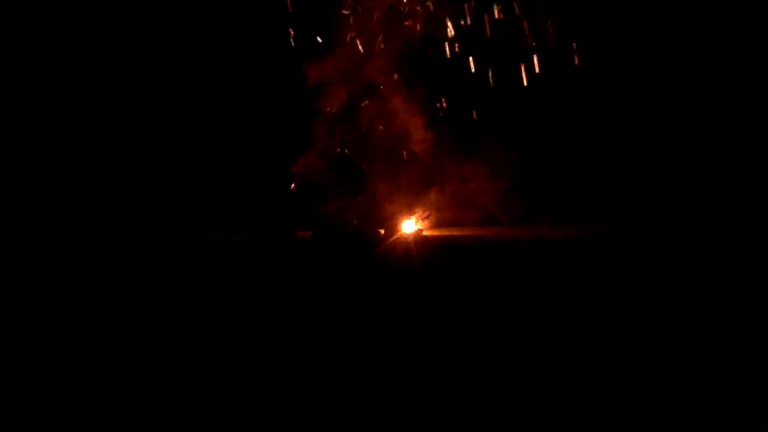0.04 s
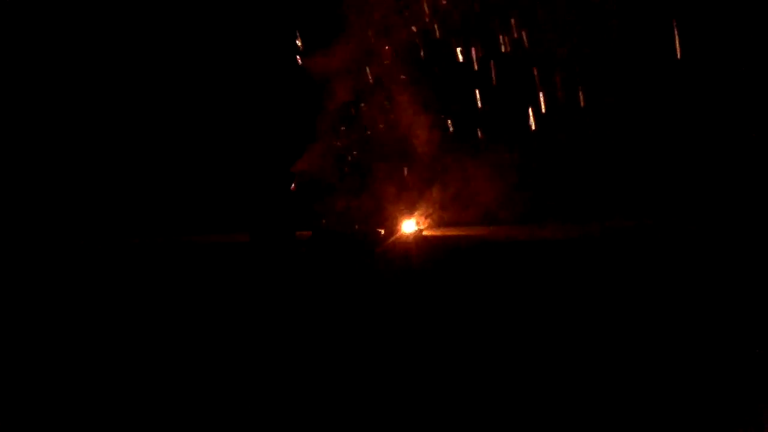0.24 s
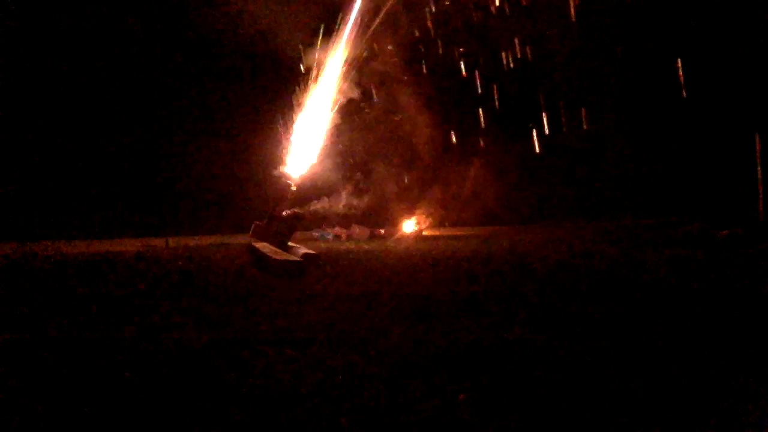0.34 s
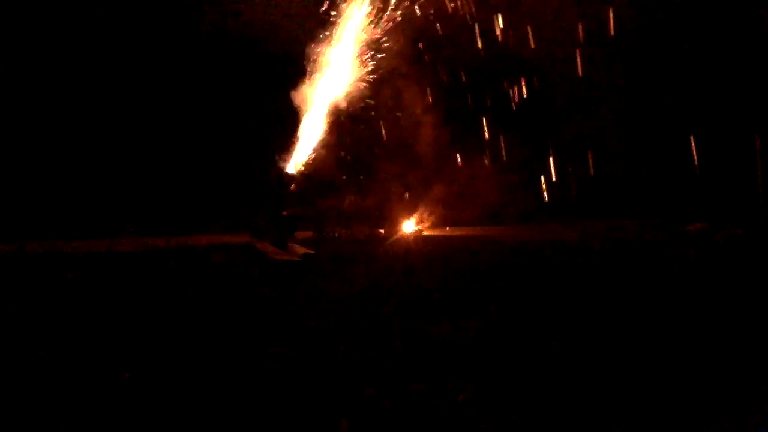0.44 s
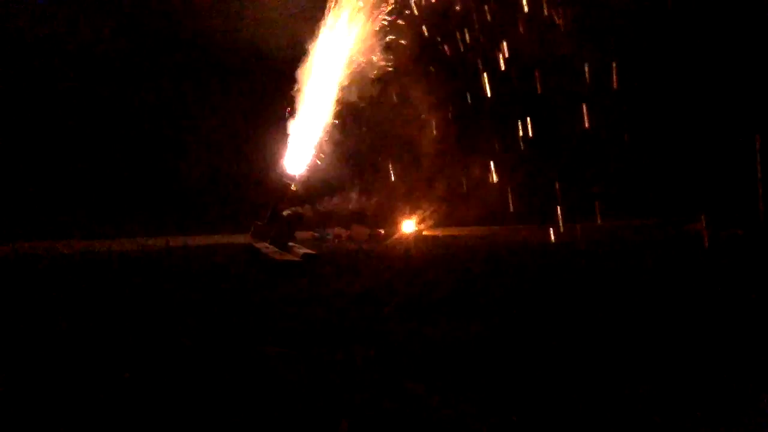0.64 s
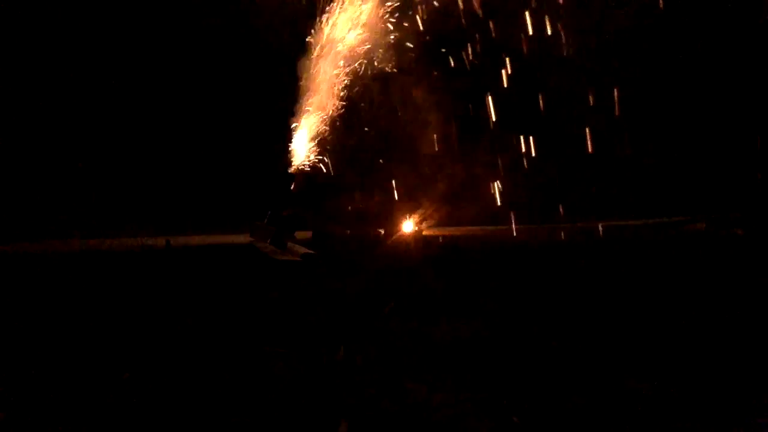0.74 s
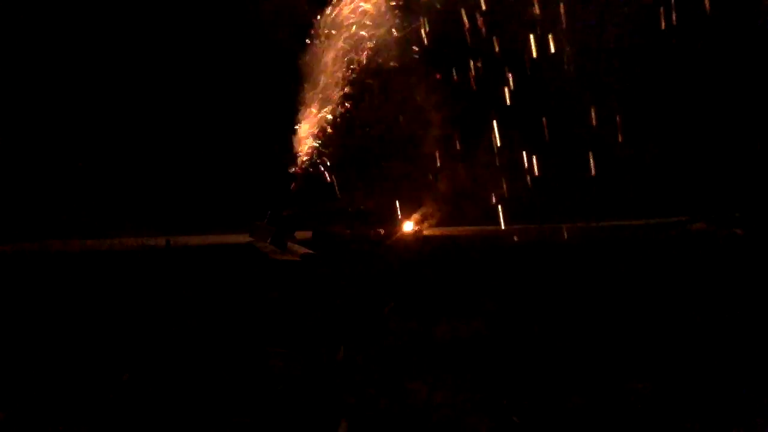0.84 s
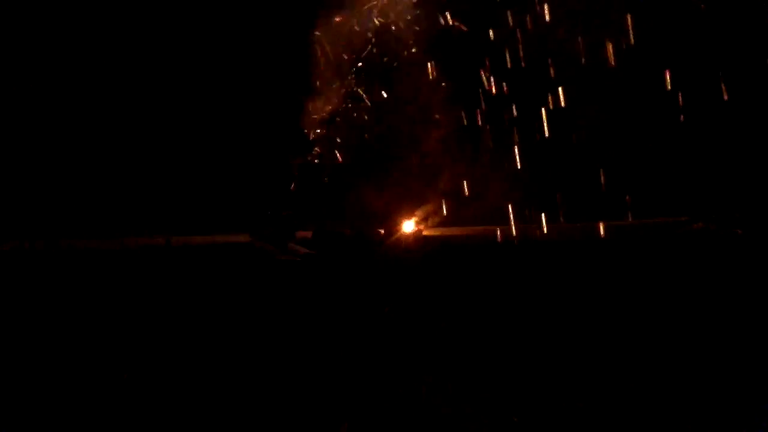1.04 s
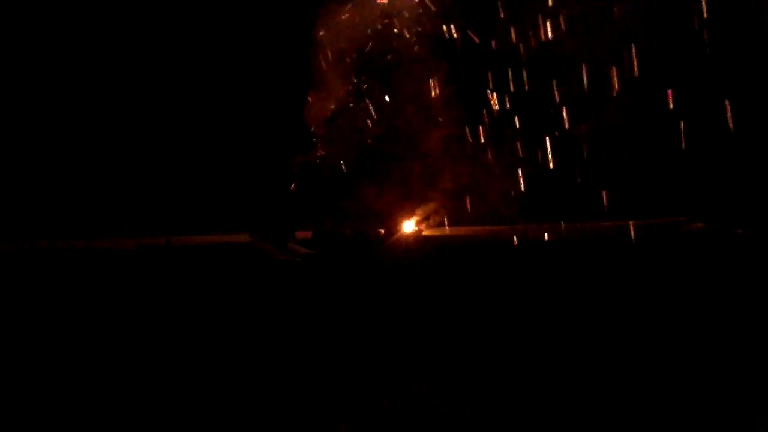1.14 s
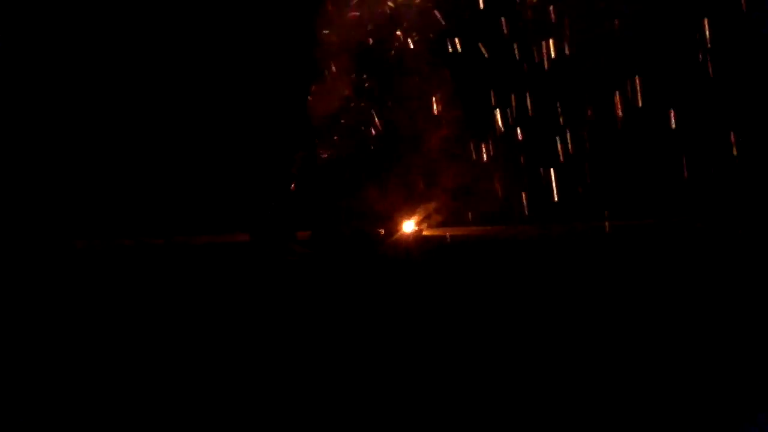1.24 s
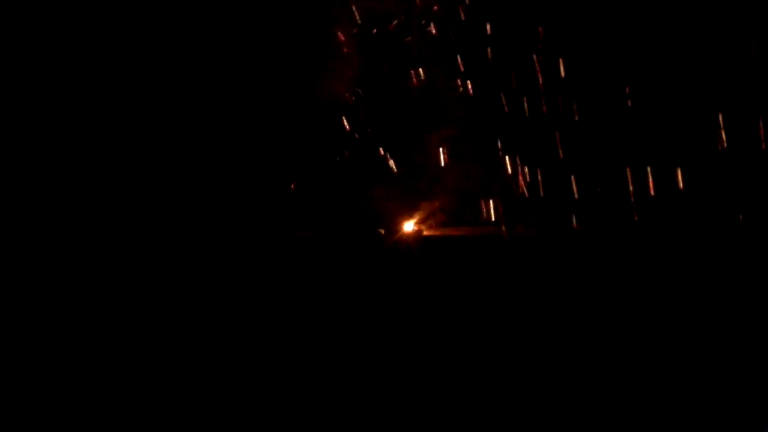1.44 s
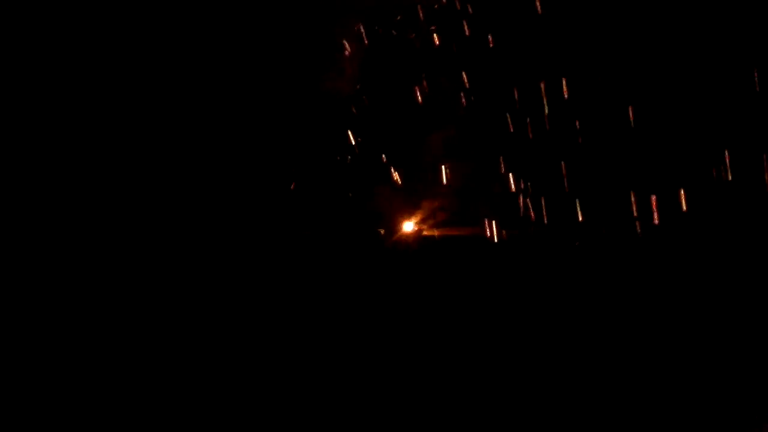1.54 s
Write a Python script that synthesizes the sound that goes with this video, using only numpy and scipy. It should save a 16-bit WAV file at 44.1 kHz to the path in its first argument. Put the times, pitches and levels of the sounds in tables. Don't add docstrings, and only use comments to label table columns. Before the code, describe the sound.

Firework crackle outdoors at night, close and clipping. A few dry snaps begin near 0.03 s, thickening from 0.2 s. A heavy launch thump hits at 0.29 s, another at 0.51 s, a smaller one at 0.59 s. Dense, harsh crackling peaks from 0.7 to 0.92 s; gas spits near 0.97 s. Lighter, brighter snaps run from 1.04 to 1.41 s, thinning over hiss and dull echo into near silence by 1.5 s.

```python
import sys
import numpy as np
from scipy import signal
from scipy.fft import rfft, irfft
from scipy.io import wavfile

SR = 44100
rng = np.random.default_rng(int(sys.argv[2]) if len(sys.argv) > 2 else 0)


def generate_wav(signal):
    frames = np.transpose(np.atleast_2d(signal))
    scaled = np.clip(frames, -1, 1) * 32767
    pcm = np.round(scaled).astype(np.int16)
    wavfile.write(sys.argv[1], SR, pcm)


def voltage_ratio(decibels):
    exponent = np.asarray(decibels, float) / 20
    return 10 ** exponent


N = 70560

# f/Hz, level/dB, t60/s
CRACK_MODES = [(8870, 0.5, 0.00091), (7430, -5.5, 0.0021), (10800, -11, 0.0015)]
# f/Hz, level/dB
GAS_COLOUR = [(120, -42), (200, -4.5), (1400, -3.5), (2090, -3), (3560, -8.5), (3900, -8.5), (8120, -2),
              (16000, -19)]


def ring(clicks, hz, t60):
    radius = voltage_ratio(-60 / (t60 * SR))
    angle = 2 * np.pi * hz / SR
    feedback = [1, -2 * radius * np.cos(angle), radius * radius]
    return signal.lfilter([0, np.sin(angle)], feedback, clicks + 1e-18)


def train(s, gains):
    return np.bincount((np.asarray(s) * SR).astype(int), gains, N + SR)[:N]


def rings(s, gains, hz, t60, size):
    pitch_scatter = 0.1
    out = 0
    for k in range(5):
        pitch = hz * np.exp(pitch_scatter * (k - 2) / 2)
        out = out + ring(train(s, gains * (size == k)), pitch, t60)
    return out


def coloured(spectrum):
    hz, db = np.transpose(spectrum)
    f = np.fft.rfftfreq(N, 1 / SR) + 1
    gain = voltage_ratio(np.interp(np.log(f), np.log(hz), db))
    noise = irfft(rfft(rng.standard_normal(N)) * gain, N)
    return noise / noise.std()


def dying(clicks, t60):
    return signal.lfilter([1], [1, -voltage_ratio(-60 / (t60 * SR))], np.abs(clicks) + 1e-18)


def band_noise(low_hz, high_hz):
    band = signal.butter(2, [low_hz, high_hz], "band", fs=SR, output="sos")
    noise = signal.sosfilt(band, rng.standard_normal(N))
    return noise / noise.std()


def night():
    # f/Hz, level/dB
    air_colour = [(59, -23), (100, 6), (1610, 21), (2750, 14.5), (7450, -31), (16000, -30)]
    return voltage_ratio(-80) * coloured(air_colour)


def fizz():
    # t/s, level/dB
    vigour_curve = [(0, -40), (.02, -17), (.032, -5), (.2, -2), (.35, 16), (.7, 8.5), (.97, 23), (1.1, 14),
                    (1.3, 13), (1.44, 6), (1.48, -18), (1.6, -25)]
    ticks_per_s, tick_db, spread_db, hiss_db = 500, -48, 3.0, -48
    vigour = voltage_ratio(np.interp(np.arange(N) / SR, *np.transpose(vigour_curve)))
    tick_size = voltage_ratio(tick_db + spread_db * np.minimum(rng.exponential(1, N), 4))
    ticks = tick_size * (rng.random(N) < ticks_per_s / SR)
    sparks = sum(voltage_ratio(g) * ring(ticks, hz, t60) for hz, g, t60 in CRACK_MODES[::2])
    return vigour * (sparks + voltage_ratio(hiss_db) * coloured(GAS_COLOUR))


def stars(big_gain, overload_gain):
    # t/s, crack level/dB, body level re crack/dB
    star_bursts = [(0.0263, -7.5, -16), (0.1332, 1.0, -18.8), (0.2131, -0.4, -23.6), (0.2195, 1.2, -20.8),
                   (0.2341, -12.8, -16.5), (0.2402, -20.3, -21.4), (0.25, -0.6, -26.3),
                   (0.2533, 1.8, -16.8), (0.2579, 0.3, -23.4), (0.2722, 1.5, -16.4), (0.2763, 0.0, -23.4),
                   (0.2778, 1.7, -16.9), (0.2797, 1.0, -19.8), (0.2819, -7, -20), (0.2835, -0.3, -18.9),
                   (0.2854, 0.6, -17.5), (0.2865, 0.5, -13.4), (0.2874, 0.7, -10.1), (0.2956, 1.1, -12.9),
                   (0.2988, -4, -14), (0.3068, -16, -7.0), (0.3248, -1.7, -24.1), (0.344, -5.1, -17.5),
                   (0.3471, -2.9, -24.0), (0.35, -0.0, -20.5), (0.3561, 0.6, -20.7), (0.3778, 0.2, -19.4),
                   (0.3809, -1.0, -20.9), (0.39, -13.8, -22.4), (0.4037, 1.0, -17.5),
                   (0.4083, -0.4, -23.3),
                   (0.4628, -8.2, -23.2), (0.471, 0.8, -21.7), (0.4809, 1.7, -16.4),
                     (0.4828, -15.6, -20.5), (0.4922, -15.9, -11.1), (0.5874, 2.0, -24),
                     (0.6339, 2.7, -10.6), (0.6482, -1.1, -7.9), (0.6546, 2.3, -8.2), (0.6611, 2.7, -9.6),
                     (0.705, 1.9, -9.6), (0.7129, 2.1, -8.5), (0.7153, 2.3, -9.4), (0.718, 2.4, -6.6),
                     (0.7187, 0.0, -7.0), (0.7222, -8.3, -9.8), (0.7344, 2.5, -7.7), (0.7365, 1.0, -6.4),
                     (0.7388, 2.1, -8.4), (0.7433, 2.0, -9.7), (0.7471, 2.2, -8.6), (0.7527, 2.1, -7.1),
                     (0.7585, 2.1, -9.1), (0.7596, 1.8, -6.4), (0.7638, 1.9, -7.9), (0.7677, 2.4, -11.3),
                     (0.7705, 2.7, -8.6),
                   (0.7778, 2.8, -13.7), (0.7792, 2.3, -13.7), (0.7803, 2.2, -9.8), (0.7813, 1.6, -6.2),
                  (0.7822, 1.0, -8.2), (0.7838, 1.6, -6.9), (0.7901, 1.8, -10.0), (0.7974, 2.7, -8.3),
                  (0.8077, 2.0, -9.0), (0.8083, 0.0, -7.0), (0.8103, 2.6, -7.1), (0.8144, 1.4, -6.6),
                  (0.8326, 1.4, -6.2), (0.8336, 2.7, -7.4), (0.8429, 1.3, -5.7), (0.8545, 2.3, -9.0),
                  (0.8598, 1.1, -6.7), (0.8607, 1.2, -4.8), (0.8723, 1.3, -6.0), (0.8737, 2.4, -8.6),
                  (0.8903, 2.3, -8.5), (0.8975, 1.5, -7.0), (0.9103, -0.5, -3.5), (0.9184, 1.7, -6.8),
                   (1.0355, -4.5, -19), (1.0584, 0.4, -26.2), (1.0637, -10.1, -17.6), (1.0809, -0.5, -18.6),
                   (1.0843, -4, -25.3), (1.0955, -22, -8), (1.1133, -15.4, -11.2), (1.1174, -3.4, -17.8),
                   (1.1255, 0.4, -17.1), (1.1268, -2.5, -17.0), (1.1342, -5.1, -15.3), (1.1383, -7.0, -9.7),
                   (1.1416, -3.7, -22.6), (1.1463, -4.3, -4.7), (1.1588, -1.1, -10.8),
                   (1.1605, -13.5, -11.6), (1.1645, -2.4, -21.2), (1.1675, -0.7, -15.8),
                   (1.1714, 0.4, -25.2), (1.1733, 0.5, -18.5), (1.1744, -1.0, -18.8), (1.1755, -0.9, -17.2),
                   (1.1804, 0.8, -16.7), (1.1849, -1.7, -18.9), (1.1925, -9.5, -25.3),
                   (1.1942, -13.4, -13.6),
                   (1.2019, 0.8, -23.9), (1.2054, -10.9, -17.7), (1.208, -9.3, -28.1),
                   (1.2099, -14.4, -20.0), (1.2139, -6.4, -14.7), (1.2167, -15.9, -17.6),
                   (1.2241, -0.6, -20.5), (1.2252, -5.9, -19.7), (1.2271, -7.7, -20.7),
                   (1.2325, -1.4, -23.8), (1.2341, -15.4, -18.8), (1.2396, -17.1, -16.2),
                   (1.2466, -11.8, -25.1), (1.2512, -5.7, -15.9), (1.2547, -8.2, -20.1),
                   (1.2612, 1.3, -15.0), (1.2632, -13.2, -13.7), (1.2727, -1.4, -17.8),
                   (1.2876, -1.9, -21.3), (1.2997, 0.3, -18.0), (1.3152, -14.7, -17.9),
                   (1.3224, 1.9, -14.3), (1.3285, -18, -20), (1.3338, -2.1, -17.2), (1.3431, 1.8, -15.2),
                   (1.3768, -26, -18.7), (1.4146, -2, -18)]
    # f/Hz, level/dB, t60/s
    body_modes = [(2960, -1.5, 0.0035), (5720, -5, 0.00083), (1157, 2.5, 0.0027), (600, -17, 0.0049),
                  (288, -10.5, .013)]
    # t/s, first body mode level/dB
    ground_image = [(0, -21), (.2, -5), (.6, -2), (1.0, 0), (1.25, -5), (1.33, 7), (1.6, -10)]
    lead_s, suction_s = .00007, .00008
    mode_scatter_db, big_from_db = 1.5, -17.5
    small_thud_share = 0.54
    bounce_s, bounce_db = .0006, -14
    grit_db, grit_share, grit_t60_s = -16.5, 0.17, .008
    crack_cut_hz = 16000

    flurries = np.array(star_bursts)
    s, db, body_db = np.transpose(flurries)
    big_db = big_gain * np.maximum(body_db + np.minimum(db, 0) - big_from_db, 0)
    s = s + lead_s * (.3 + 1.4 * rng.random(len(s)))
    db = db + big_db + overload_gain * np.maximum(db, 0)
    luck_db = mode_scatter_db * rng.standard_normal((len(s), 10))
    size = rng.integers(0, 5, (len(s), 8))
    size[:, 1] = 2

    crack = 0
    for k, (hz, g, t60) in enumerate(CRACK_MODES):
        crack = crack + rings(s, voltage_ratio(db + g + luck_db[:, k]), hz, t60, size[:, k])

    body = 0
    for k, (hz, g, t60) in enumerate(body_modes):
        sucked = hz < 2000
        sign = -1 if sucked else 1
        mode_db = db + body_db + g
        if k == 0:
            mode_db = mode_db + np.interp(s, *np.transpose(ground_image))
        if k == 4:
            mode_db = mode_db - small_thud_share * (body_db + 12)
        if k != 2:
            mode_db = mode_db + 2 * luck_db[:, 3 + k]
        body = body + sign * rings(s + sucked * suction_s, voltage_ratio(mode_db), hz, t60, size[:, 3 + k])

    late = s + bounce_s * np.exp(luck_db[:, 9] / 3)
    bounce = train(late, voltage_ratio(db + bounce_db + 2 * luck_db[:, 8]))
    crack = crack + ring(bounce, *CRACK_MODES[0][::2])
    grit_decay = dying(train(s, voltage_ratio(db + grit_share * body_db)), grit_t60_s)
    grit = voltage_ratio(grit_db) * grit_decay * coloured(GAS_COLOUR)
    return signal.lfilter(*signal.butter(1, crack_cut_hz, fs=SR), crack) + grit, body


def echo(sent):
    # delay t/s, level/dB
    delay_curve = [(0, -39.5), (.012, -70), (.049, -64), (.056, -63.5), (.112, -57), (.14, -62.5),
                   (.19, -70), (.3, -69.5), (.6, -108)]
    # f/Hz, level/dB, extra loss/(dB/s)
    absorption = [(270, -0.5, 26), (528, -3.5, 3.5), (1007, 0, 7), (1850, -2.5, 7), (4640, 7.5, 23),
                  (7340, -5.5, 102), (9800, -9.5, 248), (14000, -9, 398)]
    bearing_s, knee_s = .007, 0.087
    t = np.arange(int(delay_curve[-1][0] * SR)) / SR
    bearing = (np.arange(N) / SR / bearing_s).astype(int) % 4
    white = rng.standard_normal((2, 4, SR))
    reply = 0
    for k, (hz, db, loss_db) in enumerate(absorption):
        edges_hz = [hz * .7, min(hz * 1.4, .45 * SR)]
        band_pass = signal.butter(2, edges_hz, "band", fs=SR, output="sos")
        band = signal.sosfilt(band_pass, white[k % 2])
        reply = reply + band[:, :len(t)] * voltage_ratio(db - loss_db * np.maximum(t - knee_s, 0))
    reply = reply * voltage_ratio(np.interp(t, *np.transpose(delay_curve)))
    return sum(signal.fftconvolve(sent * (bearing == k), reply[k])[:N] for k in range(4))


def puffs():
    # t/s, level/dB, half length/s
    breaths = [
        (.091, -34, .0065),
        (.965, -23, .002),
        (.98, -27, .003),
        (.196, -50, .008),
        (.505, -33, .002),
        (1.45, -40, .006),
    ]
    t = np.arange(N) / SR
    envelope = sum(voltage_ratio(db) * np.exp(-((t - s) / half) ** 2 / 2) for s, db, half in breaths)
    return envelope * coloured(GAS_COLOUR)


def lifts():
    # t/s, level/dB, tube f/Hz, t60/s, wall ring level re charge/dB
    charges = [
        (.2884, 10, 275, .018, -9),
        (.5084, 9, 292, .018, -12),
        (.5875, -6, 135, .016, -1),
        (.967, -29, 130, .07, -30),
        (.39, -24, 125, .05, -30),
    ]
    shock_db, shock_hz, shock_t60_s = 6, 1450, .002
    bounce_s, bounce_db = .00072, -4
    wall_hz, wall_t60_s = 3400, .005
    swing_lag_cycles, ground_db = .09, -24.5
    rumble_db, rumble_hz, rumble_t60_s, rise_t60_s = -21.5, 1520, 0.091, 0.021
    boom_db, boom_hz, boom_t60_s = -27, 460, 0.18
    spit_db, spit_t60_s = -11, .006

    out = np.zeros(N)
    rumble = band_noise(120, rumble_hz)
    spit = coloured(GAS_COLOUR)
    roll = band_noise(boom_hz / 3, boom_hz)
    for s, db, hz, t60, wall_db in charges:
        click = train([s], [voltage_ratio(db)])
        swing = train([s + swing_lag_cycles / hz], [voltage_ratio(db)])
        front_db = db + shock_db + 2 * min(db, 0)
        front = train([s, s + bounce_s], voltage_ratio(front_db + np.array([0, bounce_db])))
        out += ring(front, shock_hz, shock_t60_s)
        out += voltage_ratio(wall_db) * ring(click, wall_hz, wall_t60_s)
        out -= ring(swing, hz, t60) + voltage_ratio(ground_db) * ring(swing, hz / 2, t60 * 2)
        rise = dying(click, rise_t60_s)
        out += voltage_ratio(rumble_db) * (dying(click, rumble_t60_s) - rise) * rumble
        out += voltage_ratio(boom_db) * (dying(click, boom_t60_s) - rise) * roll
        out += voltage_ratio(spit_db) * dying(click, spit_t60_s) * spit
    return out


def scene():
    crack, body = stars(big_gain=0.6, overload_gain=0)
    lift = lifts()
    far_crack, far_body = stars(big_gain=0.88, overload_gain=0.66)
    wash = echo(voltage_ratio(2) * far_crack + voltage_ratio(3.5) * far_body + voltage_ratio(1) * lift)
    return (crack + body + lift + wash + puffs() + fizz() + night())[None]


def low_pass(x):
    return signal.sosfilt(signal.butter(12, 16550, fs=SR, output="sos"), x)


def record(dry):
    low_cut_hz, knee, top_cut_hz = 115, 8, 16150
    x = signal.sosfilt(signal.butter(1, low_cut_hz, "high", fs=SR, output="sos"), dry)
    x = x / (1 + np.abs(x) ** knee) ** (1 / knee)
    top_cut = signal.cheby2(12, 25, top_cut_hz, fs=SR, output="sos")
    x = np.clip(signal.sosfiltfilt(top_cut, x), -1, 1)
    return low_pass(x)


dry = scene()
out = record(dry)
generate_wav(out)
```